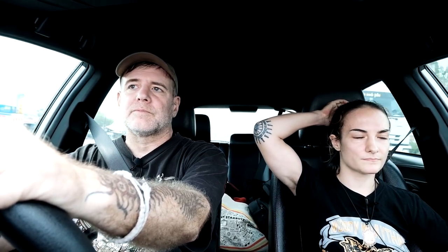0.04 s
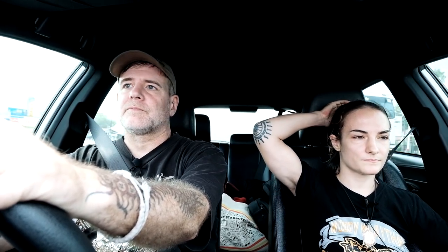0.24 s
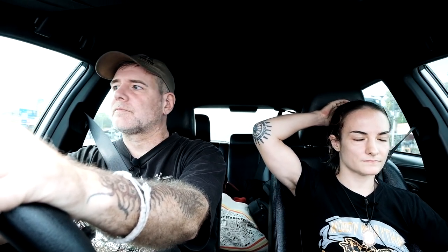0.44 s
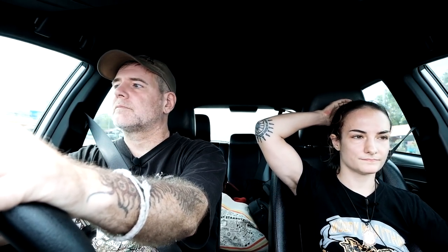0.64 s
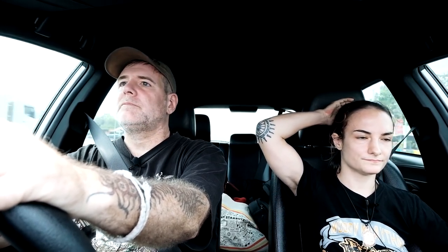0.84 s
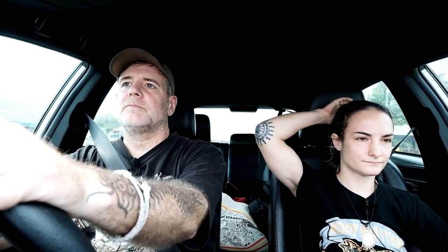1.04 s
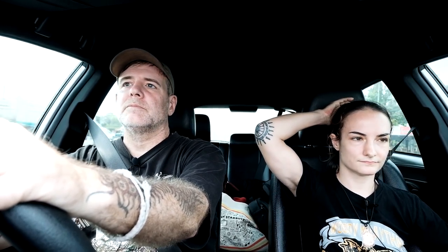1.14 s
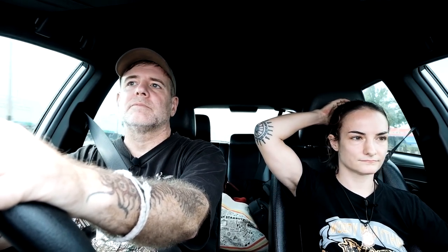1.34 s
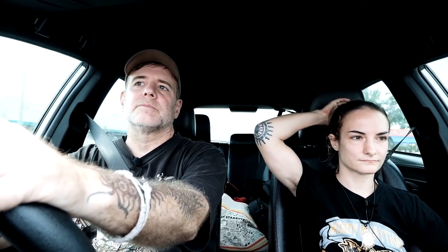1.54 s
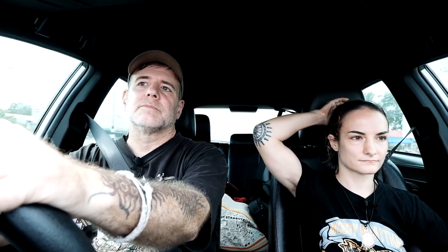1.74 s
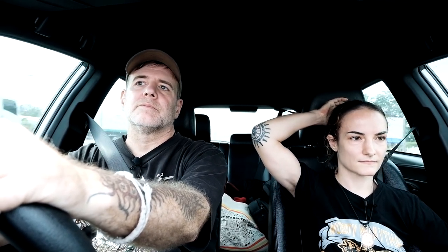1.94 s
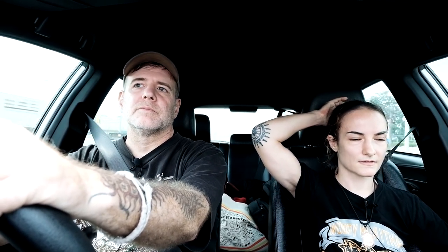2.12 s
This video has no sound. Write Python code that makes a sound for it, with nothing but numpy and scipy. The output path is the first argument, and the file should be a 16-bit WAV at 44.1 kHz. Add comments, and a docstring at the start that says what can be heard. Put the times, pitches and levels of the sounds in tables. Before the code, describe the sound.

Car interior at cruising speed: deep, uneven road boom, dull tyre roar and a low engine hum

```python
"""Inside a car cruising at a steady speed. Uneven road makes the body boom: low noise that swells and sinks.
Tread drums on panels and cabin air: dull road noise plus narrow resonances, each register with its own level.
The engine hums underneath as a sine and its third harmonic, beside a thin gliding drive-train whine.
A faint high hiss flickers with the peaks of the rumble; trim ticks are decaying bursts of resonant noise.
The recorder's limiter holds down the peaks. All source levels are taken before its make-up gain."""
import sys
import numpy as np
from scipy import signal
from scipy.fft import irfft, next_fast_len
from scipy.io import wavfile
from scipy.ndimage import uniform_filter1d, minimum_filter1d

SR = 44100
rng = np.random.default_rng(int(sys.argv[2]) if len(sys.argv) > 2 else 0)


def waveform_to_disk(signal):
    """Save audio, clipped to [-1, 1], as 16-bit WAV at the path in sys.argv[1]."""
    frames = np.transpose(np.atleast_2d(signal))
    scaled = np.clip(frames, -1, 1) * 32767
    samples = np.round(scaled).astype(np.int16)
    wavfile.write(sys.argv[1], SR, samples)


N = 96093  # length in samples


def undb(db):
    """Logarithmic level: 20 dB is a factor of ten in amplitude."""
    return 10 ** (np.asarray(db) / 20)


def shaped(gain):
    """Spectral synthesis: random phases under the magnitude gain(Hz) give noise of rms 1."""
    size = next_fast_len(N)
    hz = np.maximum(np.arange(size // 2 + 1) * SR / size, 1)
    random_phase = np.exp(2j * np.pi * rng.random(len(hz)))
    noise = irfft(gain(hz) * random_phase, size)[:N]
    return noise / np.std(noise)


def coloured(points):
    """Coloured noise: the level is linear in log frequency between points, with silence outside them."""
    f, db = np.array(points).T

    def gain(hz):
        return undb(np.interp(np.log(hz), np.log(f), db, left=-np.inf, right=-np.inf))

    return shaped(gain)


def resonance(centre_hz, width_hz):
    """Resonance: a steep-sided peak selects noise; its full width is width_hz near -3.5 dB."""
    def gain(hz):
        detuning = (hz - centre_hz ** 2 / hz) / (2 * width_hz)
        return 1 / (1 + 2 * detuning ** 2)

    return shaped(gain)


def walk(rate_hz):
    """Slow modulation: Gaussian low-passed noise makes a smooth random drift with spread 1."""
    return shaped(lambda hz: np.exp(-(hz / max(rate_hz, 1)) ** 2))


def curve(rows, t):
    """Piecewise-linear envelope through (time, value) rows."""
    return np.interp(t, *np.array(rows).T)


# Spectrum of the high hiss, relative: f/Hz, level/dB
HISS_SPECTRUM = [(1500, -8), (3000, -1), (5000, 0), (7000, -3), (10000, -7), (15500, -9)]
HISS_DB, HISS_PULSE_DB = -70.8, 6  # base level; range of the pulsing
HISS_FLICKER_DB, HISS_FLICKER_HZ = 1.7, 400  # spread and rate of the random flicker


def hiss(rumble):
    """Amplitude modulation: a faint high hiss flickers with the peaks of the rumble."""
    power = rumble ** 2 / np.mean(rumble ** 2)
    swing = np.tanh(power / 4)  # saturates on the largest swings
    pulse_db = HISS_PULSE_DB * (swing - swing.mean())
    flicker_db = HISS_FLICKER_DB * walk(HISS_FLICKER_HZ)
    return coloured(HISS_SPECTRUM) * undb(HISS_DB + pulse_db + flicker_db)


# Trim ticks: onset t/s, level/dB (twice the rms at onset), ring f/Hz, bandwidth/Hz, decay time constant/s
TRIM_TICKS = [(1.327, -59, 4800, 2600, 0.0084), (1.458, -62, 4150, 2660, 0.0059),
              (1.671, -63, 5500, 3480, 0.0043), (1.775, -51, 2820, 300, 0.0075),
              (1.775, -55.5, 5060, 2600, 0.007), (2.0591, -52, 6626, 2000, 0.0013),
              (2.0677, -53.5, 4540, 703.6, 0.004), (2.0676, -50, 7150, 1700, 0.00099),
              (2.1248, -54.5, 6500, 1200, 0.002)]


def trim(t):
    """Damped resonance: small plastic ticks die exponentially in a few milliseconds."""
    ticks = 0
    for onset, db, ring_hz, width_hz, decay in TRIM_TICKS:
        envelope = (t >= onset) * np.exp(-np.abs(t - onset) / decay)
        ticks = ticks + undb(db) / 2 * envelope * resonance(ring_hz, width_hz)
    return ticks


# Drive-train whine, before random drift: t/s, pitch f/Hz, rms level/dB
WHINE_COURSE = [(0, 576, -51.5), (0.45, 571, -51), (0.8, 560, -56), (1.05, 562, -59), (1.15, 565, -54),
                (1.37, 576, -49.5), (1.6, 572, -53.5), (1.95, 572, -54.5), (2.18, 578, -49)]
WHINE_WANDER, WHINE_WALK_DB = 0.008, 1.4  # spread of pitch (fraction) and of level


def whine(t):
    """Frequency modulation: a thin drive-train tone glides, fades and returns; phase integrates frequency."""
    at, hz, db = np.array(WHINE_COURSE).T
    pitch_hz = np.interp(t, at, hz) * (1 + WHINE_WANDER * walk(11.3))
    phase = 2 * np.pi * np.cumsum(pitch_hz) / SR
    level = undb(np.interp(t, at, db) + WHINE_WALK_DB * walk(7))
    return np.sqrt(2) * level * np.sin(phase)  # root two turns rms into peak


# Engine speed and load, before random drift: t/s, firing rate f/Hz, rms level/dB
ENGINE_COURSE = [(0, 85.38, -42), (0.799, 84.84, -48), (1.1, 83.44, -31.5), (1.35, 86.03, -31.5),
                 (1.701, 85.87, -34.5), (1.9, 85.57, -39), (2.18, 87.2, -32.5)]
ENGINE_WANDER, ENGINE_WALK_DB = 0.0043, 1.5  # spread of firing rate (fraction) and of level
THIRD_DB, THIRD_WALK_DB = -47, 3  # rms level of the third harmonic and its spread


def engine(t):
    """Harmonic series: a hum at the firing rate follows the load, with a faint phase-locked third harmonic."""
    at, hz, db = np.array(ENGINE_COURSE).T
    firing_hz = np.interp(t, at, hz) * (1 + ENGINE_WANDER * walk(4.5))
    phase = 2 * np.pi * (rng.random() + np.cumsum(firing_hz) / SR)
    firing = undb(np.interp(t, at, db) + ENGINE_WALK_DB * walk(7.1)) * np.sin(phase)
    third = undb(THIRD_DB + THIRD_WALK_DB * walk(6)) * np.sin(3 * phase)
    return np.sqrt(2) * (firing + third)  # root two turns rms into peak


# Spectrum of the broad road roar, relative: f/Hz, level/dB
ROAD_SPECTRUM = [(40, -11), (70, 1), (125, 0.5), (180, -13), (215, -6.5), (285, -15.5), (405, -19.5),
                 (450, -16.5), (620, -24), (760, -21), (950, -25), (1130, -27), (1280, -32), (1550, -36.5),
                 (2000, -44), (2700, -53), (4500, -65)]
# Cabin and panel resonances, before the register contours: f/Hz, bandwidth/Hz, rms level/dB
CABIN_MODES = [(98, 11.6, -37), (142.05, 20.9, -32.5), (164.5, 8.1, -37.5), (241.3, 7.5, -48.5),
               (321, 24, -51), (369, 36, -55), (530.7, 30, -53), (563, 27, -56), (1067, 60, -58)]
# Contour of the low drone, used relative to its mean: t/s, level/dB before depth scaling
DRONE_CONTOUR = [(0.03, -30), (0.41, -27), (0.631, -30), (0.748, -27), (0.999, -27), (1.12, -24),
                 (1.3, -25), (1.492, -27.5), (1.85, -34), (2.15, -27)]
# Contour of the low middle, used relative to its mean: t/s, level/dB before depth scaling
LOW_MID_CONTOUR = [(0.03, -45.5), (0.14, -32), (0.5, -41.5), (0.68, -40.5), (0.89, -35.5), (0.96, -39),
                   (1.55, -39), (1.79, -43), (1.89, -36.5), (2.15, -35.5)]
# Contour of the middle as the road surface varies, used relative to its mean: t/s, level/dB before depth scaling
SURFACE_CONTOUR = [(0.03, -43), (0.54, -49), (0.57, -40), (0.6, -52), (0.892, -46), (1.0, -50.5),
                   (1.12, -44.5), (1.24, -48), (2.13, -45.5), (2.15, -42.5)]
# Gain of the upper tyre roar: t/s, level/dB
UPPER_GAIN = [(0.0, 0.5), (.15, 4.5), (.33, 0.5), (.5, -0.5), (.57, 6), (.9, 6), (1.15, 2.5), (1.4, 0.5),
              (1.8, -1.5), (2.0, 2), (2.15, 3.5)]
ROAD_DB, ROAD_WALK_DB = -33.5, 1.25  # level before the contours; spread of its random drift
# Registers from the bottom: upper edge f/Hz, contour, depth (fraction of the contour applied)
REGISTERS = [(195, DRONE_CONTOUR, 0.77), (500, LOW_MID_CONTOUR, 0.74), (1300, SURFACE_CONTOUR, 0.71)]


def tyres(t):
    """Modal excitation: tread gives a broad roar and rings cabin modes; each register follows the surface."""
    rest = coloured(ROAD_SPECTRUM) * undb(ROAD_DB + ROAD_WALK_DB * walk(30))
    for hz, width_hz, db in CABIN_MODES:
        rest = rest + undb(db) * resonance(hz, width_hz)
    roar = 0
    for edge_hz, contour, depth in REGISTERS:
        low_pass = signal.butter(4, edge_hz, fs=SR, output="sos")
        register = signal.sosfiltfilt(low_pass, rest)  # zero phase, so subtraction splits the bands
        db = curve(contour, t)
        roar = roar + register * undb(depth * (db - db.mean()))
        rest = rest - register
    return roar + rest * undb(curve(UPPER_GAIN, t))


# Spectrum of the body boom, relative: f/Hz, level/dB
BOOM_SPECTRUM = [(14, -32), (24, -11.5), (34, 0.5), (44, 6.5), (54, -3), (70, -13), (110, -32)]
# Level of the boom as the road heaves: t/s, rms level/dB
ROAD_HEAVE = [(0.03, -25), (0.19, -32.5), (0.29, -20), (0.35, -32.5), (0.48, -19.5), (0.56, -28.5),
              (0.7, -25), (0.84, -25.5), (0.98, -21.5), (1.13, -28), (1.37, -23), (1.58, -29.5),
              (1.68, -22), (1.76, -25.5), (1.94, -26), (2.01, -33.5), (2.1, -24), (2.17, -27.5)]


def body(t):
    """Low-frequency body vibration: boom on the suspension swells with each heave of the road."""
    boom = coloured(BOOM_SPECTRUM)
    local_rms = np.sqrt(uniform_filter1d(boom ** 2, size=4400))  # a tenth of a second
    return boom / local_rms * undb(curve(ROAD_HEAVE, t))


def scene():
    """Superposition: the pressures of all sources add at the dashboard."""
    t = np.arange(N) / SR
    rumble = body(t) + tyres(t) + engine(t)
    return (rumble + whine(t) + hiss(rumble) + trim(t))[None]


MAKEUP_DB, LIMIT_DB = 1.95, -13  # gain ahead of the limiter; its threshold
LIMIT_HOLD_S, TOP_HZ = 0.01, 15700  # span of the gain minimum; upper band edge


def record(dry):
    """Dynamic-range limiting: look-ahead gain holds down the peaks, then a low-pass cuts the top."""
    x = dry * undb(MAKEUP_DB)
    hold = max(int(LIMIT_HOLD_S * SR), 8)
    threshold = undb(LIMIT_DB)
    needed_gain = threshold / np.maximum(np.abs(x), threshold)
    gain = minimum_filter1d(needed_gain, hold)  # centred, so it falls ahead of each peak
    for _ in range(2):
        gain = uniform_filter1d(gain, hold // 2)
    low_pass = signal.ellip(10, 0.1, 80, TOP_HZ, fs=SR, output="sos")
    return signal.sosfilt(low_pass, x * gain)


dry = scene()
out = record(dry)
waveform_to_disk(out)
```